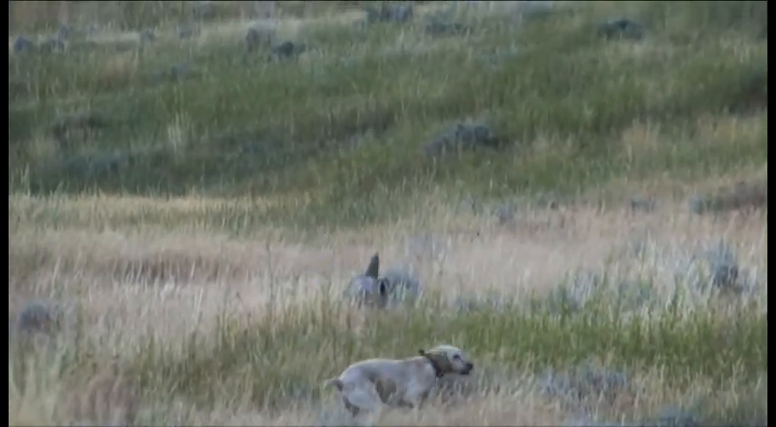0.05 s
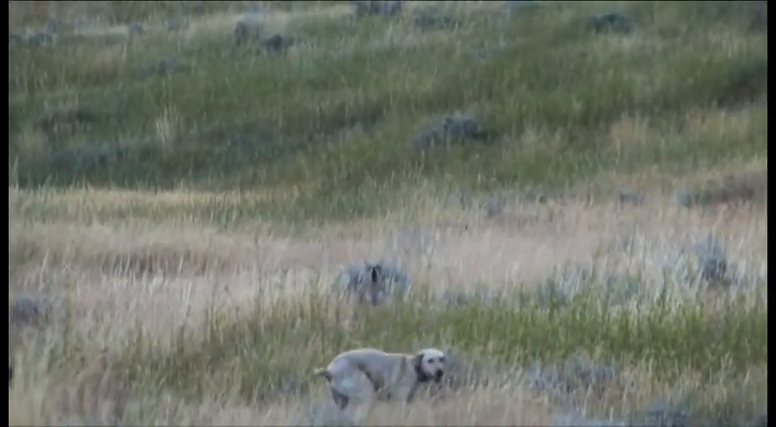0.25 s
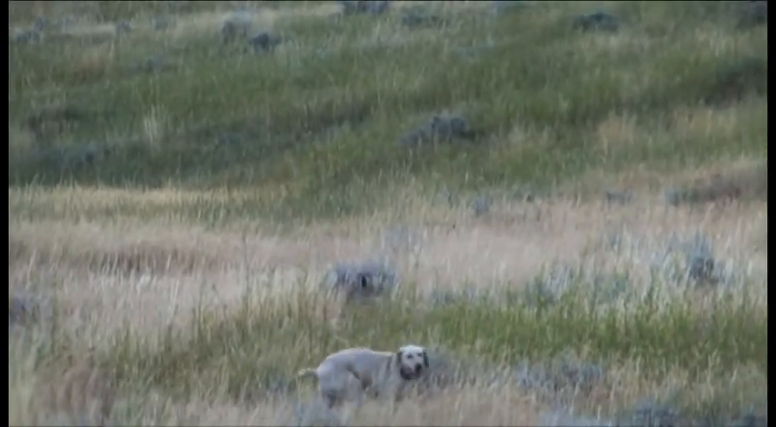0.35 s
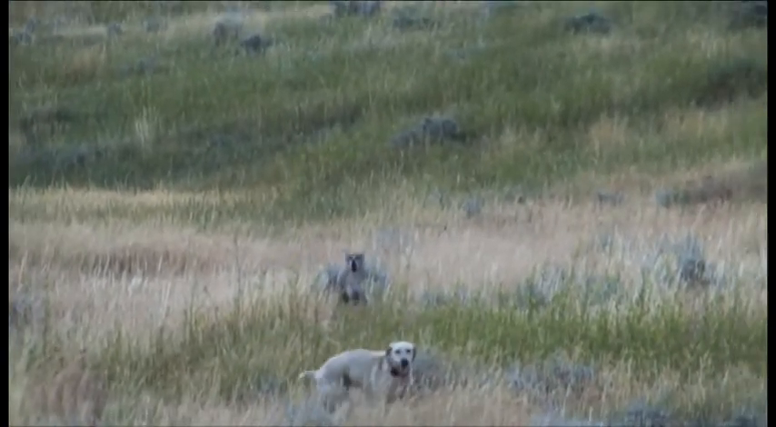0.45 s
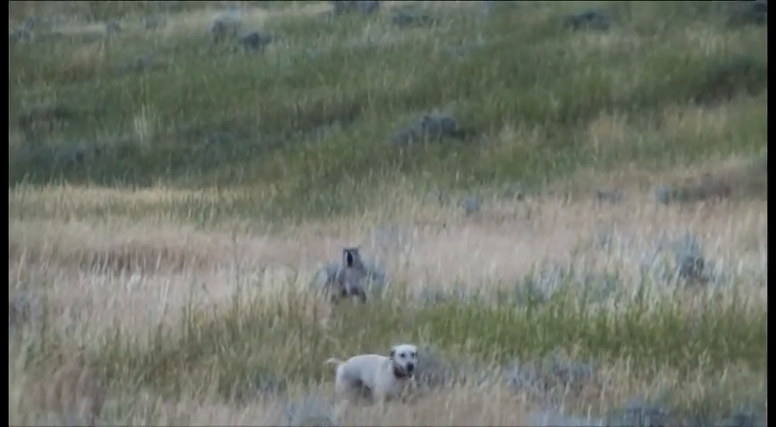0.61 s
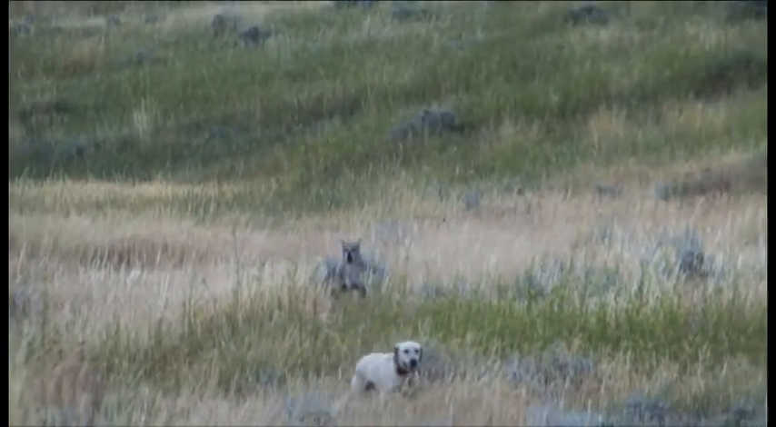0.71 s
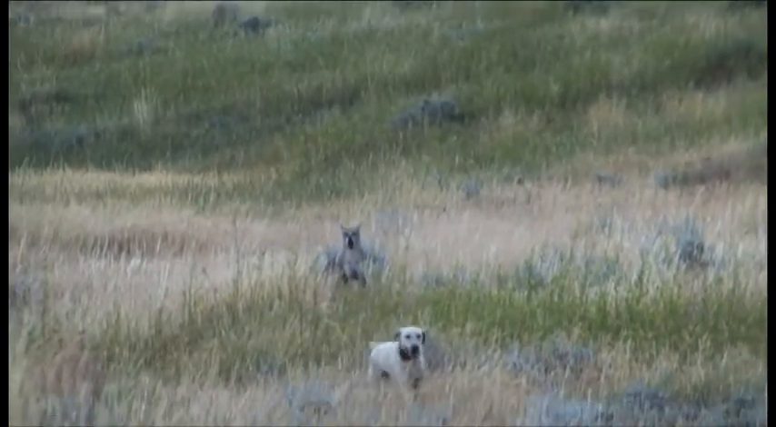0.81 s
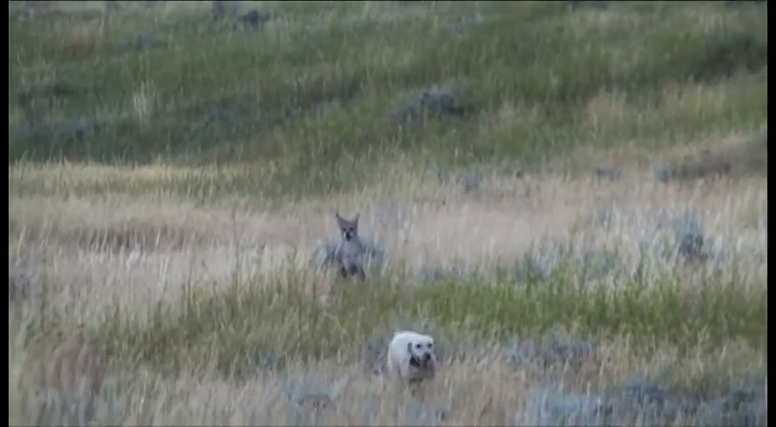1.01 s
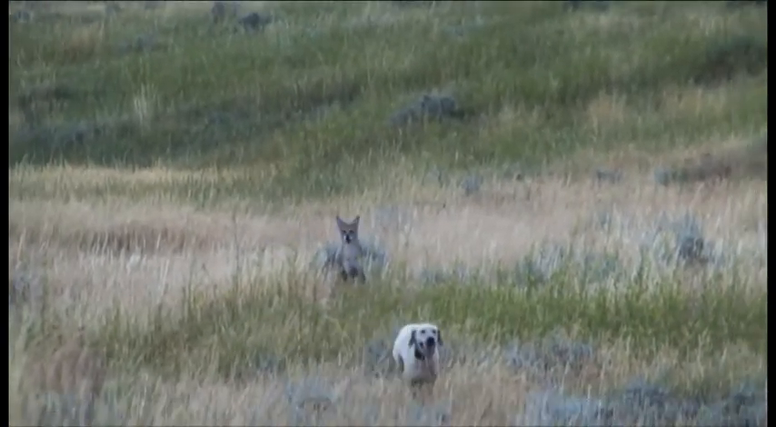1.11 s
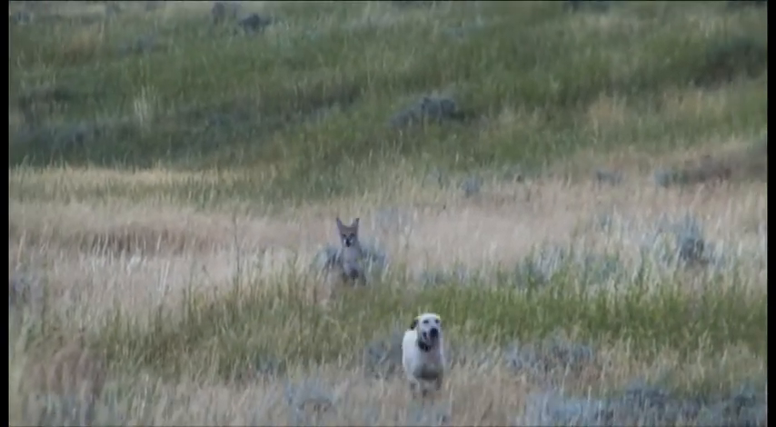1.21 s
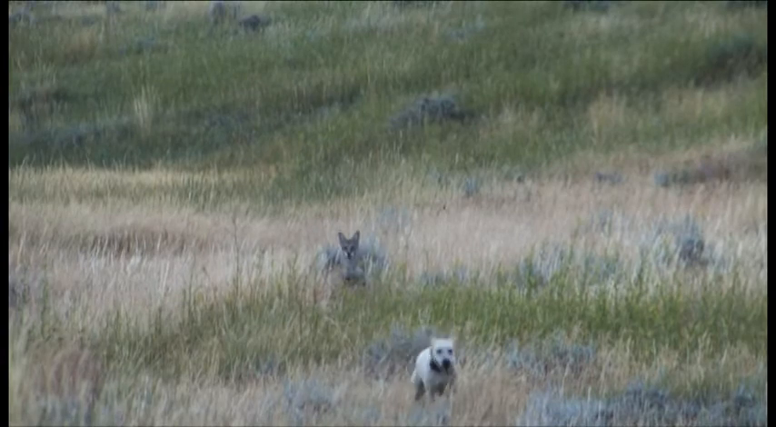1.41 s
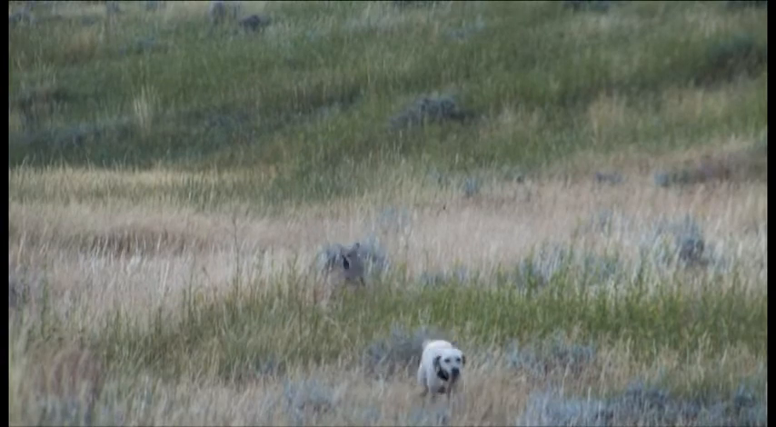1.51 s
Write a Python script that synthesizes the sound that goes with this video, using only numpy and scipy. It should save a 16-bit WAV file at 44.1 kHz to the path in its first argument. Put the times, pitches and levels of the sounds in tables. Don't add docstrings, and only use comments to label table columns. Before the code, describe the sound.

A coyote yips and barks across open grassland. The tail of a call fades by 0.1 s; a short high whine at 0.2 leads to a bark at 0.3. A long yip wavers up and down from 0.4 to 0.9, then a bark at 1.0 and a weaker one near 1.24. Distant, dulled, faintly echoing, over soft wind, hiss, low hum and a barely audible cricket.

```python
import sys
import numpy as np
from scipy import signal
from scipy.fft import rfft, irfft
from scipy.io import wavfile
from scipy.ndimage import uniform_filter1d, map_coordinates

SR = 44100
rng = np.random.default_rng(int(sys.argv[2]) if len(sys.argv) > 2 else 0)


def put_to_file(sound):
    columns = np.atleast_2d(sound).T
    safe = np.clip(columns, -1, 1)
    whole_steps = np.round(safe * 32767)
    wavfile.write(sys.argv[1], SR, whole_steps.astype(np.int16))


def volts_from_decibels(level):
    exponent = np.asarray(level, float) / 20
    return 10 ** exponent


N = 68355
T = np.arange(N) / SR
F_HZ = np.arange(1, N // 2 + 2) * SR / N


def rms_one(x):
    return x / np.sqrt(np.mean(np.abs(x) ** 2) + 1e-20)


def drift(hz):
    r = np.exp(-2 * np.pi * hz / SR)
    settle = 4000
    noise = rng.standard_normal(N + settle)
    return rms_one(signal.lfilter([1], [1, -2 * r, r * r], noise)[settle:])


def shaped_noise(response):
    return rms_one(irfft(rfft(rng.standard_normal(N)) * response, N))


def filtered(x, order, hz, kind="low"):
    return signal.sosfilt(signal.butter(order, hz, kind, fs=SR, output="sos"), x)


def tone(hz, phase=0):
    return np.sin(2 * np.pi * np.cumsum(hz) / SR + phase)


def swell(centre_s, length_s):
    return np.exp(-.5 * ((T - centre_s) / length_s) ** 2)


def air(points):
    hz, db = np.transpose(points)
    return shaped_noise(volts_from_decibels(np.interp(np.log(F_HZ), np.log(hz), db)))


def air_left():
    # f/Hz, level/dB per Hz
    spectrum = [(30, -13), (70, -3.5), (110, 5.5), (200, -10), (600, -27.5), (2000, -25.5), (6000, -30),
                (15000, -33.5)]
    return volts_from_decibels(-58.5) * air(spectrum)


def air_right():
    # f/Hz, level/dB per Hz
    spectrum = [(30, -9.5), (70, 5.5), (140, 4), (300, -2.5), (700, -9), (3500, -16), (6000, -21.5),
                (15000, -25)]
    return volts_from_decibels(-63.5 + drift(3.1)) * air(spectrum)


def hum():
    # f/Hz, level/dB rms
    lines = [(150, -56), (240, -78.5), (300, -71), (2130, -87.5)]
    out = np.zeros(N)
    for hz, db in lines:
        level = np.sqrt(2) * volts_from_decibels(db + 0.82 * drift(24.0))
        out += level * np.sin(2 * np.pi * hz * T + rng.uniform(0, 2 * np.pi))
    return out


def wind_thump():
    # t/s, level/dB, f/Hz, length/s
    thumps = [
        (0.4, -39, 96.5, 0.0084),
    ]
    return sum(volts_from_decibels(db) * swell(s, length_s) * np.sin(2 * np.pi * hz * (T - s))
               for s, db, hz, length_s in thumps)


def gust():
    rustle_hz = 290
    band = filtered(rng.standard_normal(N), 1, [rustle_hz / 2, rustle_hz * 2], "band")
    return volts_from_decibels(-57.5 + drift(8.9)) * swell(0.47, .09) * rms_one(band)


def cricket():
    tone_hz, throbs_per_s, start_cycles, level_db = 4830, 43, 0.9, -75
    throb = np.cos(2 * np.pi * (throbs_per_s * T - start_cycles) + .5 * drift(2.3)).clip(0, 1)
    return volts_from_decibels(level_db + 2.9 * drift(3)) * throb * np.sin(2 * np.pi * tone_hz * T + 2.0 * drift(60))


def slope_echo(x):
    level_db, t60_s, cut_hz, onset_s = -30.5, 0.4, 3300, 0.0042
    t = T[:SR // 4]
    tail = rng.standard_normal(len(t)) * volts_from_decibels(-60 * t / t60_s) * np.clip(t / onset_s, 0, 1)
    tail /= np.sqrt(np.sum(tail ** 2))
    return volts_from_decibels(level_db) * signal.fftconvolve(filtered(x, 2, cut_hz), tail)[:N]


def notched(x, notches):
    for hz, width_hz, db in notches:
        w, a = 2 * np.pi * hz / SR, np.pi * width_hz / SR
        zeros = [1 + a * volts_from_decibels(db), -2 * np.cos(w), 1 - a * volts_from_decibels(db)]
        poles = [1 + a, -2 * np.cos(w), 1 - a]
        x = signal.lfilter(zeros, poles, x)
    return x


def over_ground(x, notches, cut_hz, leak_db):
    x = notched(x, notches)
    return filtered(x, 4, cut_hz) + volts_from_decibels(leak_db) * x


def path_left(voice):
    # f/Hz, width/Hz, depth/dB
    notches = [(1888, 238, -21.5), (2564, 170, -13), (3503, 460, -21), (4724, 730, -17.5),
               (8910, 670, -9.5), (10600, 3600, -13)]
    return volts_from_decibels(3) * over_ground(voice + slope_echo(voice), notches, cut_hz=6530, leak_db=-10)


def path_right(voice):
    # f/Hz, width/Hz, depth/dB
    notches = [(1875, 600, -9.5), (2860, 230, -18.5), (4000, 940, -17), (850, 260, -10.5)]
    lead_s = 0.016
    turn = np.exp(2j * np.pi * np.arange(N // 2 + 1) * SR / N * lead_s)
    early = -irfft(rfft(voice) * turn, N) * (T < 1.4)
    return volts_from_decibels(-3.5) * over_ground(early + slope_echo(early), notches, cut_hz=3270, leak_db=-21)


def shade_db(rows, s, hz, width_hz, treble_hz):
    at_s, centre_hz, db, treble_db = np.transpose(rows)
    bell = np.exp(-(2 * (hz - np.interp(s, at_s, centre_hz)) / width_hz) ** 2)
    treble = np.interp(s, at_s, treble_db) / (1 + (treble_hz / hz) ** 16)
    return np.interp(s, at_s, db) * bell + treble


def wheeze():
    # t/s, level/dB, f/Hz, length/s
    puffs = [
        (0.096, -71.5, 1700, 0.026),
        (0.914, -48, 1480, 0.022),
        (1.104, -67.5, 1400, 0.015),
        (1.17, -57, 1500, 0.01),
        (1.32, -61.5, 1500, 0.013),
    ]
    width_hz = 250
    band = drift(width_hz) + 1j * drift(width_hz)
    return sum(volts_from_decibels(db) * swell(s, length_s) * np.real(band * np.exp(2j * np.pi * hz * T))
               for s, db, hz, length_s in puffs)


def whistle():
    start_hz, end_hz, fall_s, end_s = 3180, 2850, 0.016, 0.067
    hz = end_hz + (start_hz - end_hz) * np.exp(-T / fall_s)
    fade = np.clip(np.minimum(end_s - T, T - .004) / 0.0053, 0, 1)
    return volts_from_decibels(-62) * fade * tone(hz)


def moan():
    # t/s, f/Hz, level/dB
    points = [
        (.255, 638.4, -53.5),
        (.285, 531, -60),
        (.31, 511, -54.5),
        (.355, 508, -70.5),
    ]
    s, hz, db = np.transpose(points)
    fade = np.clip(np.minimum(T - s[0], s[-1] - T) / 0.0041, 0, 1)
    level = volts_from_decibels(np.interp(T, s, db) + 3 + 2.5 * drift(60))
    wobble_rad = 1.5 * drift(90) * np.clip((.305 - T) / .02, 0, 1)
    return fade * level * tone(np.interp(T, s, hz), wobble_rad)


def throat(hz):
    # f/Hz, width/Hz, level/dB
    resonances = [(819, 89, -10), (1629, 276, 1), (2175, 404, -4), (2882, 257, -10.5), (3700, 480, -21.5),
                  (5600, 2700, -60.5), (7400, 7000, -39)]
    out = 0
    for k, (f, width, db) in enumerate(resonances):
        out = out + (-1) ** k * volts_from_decibels(db) * 1j * hz * width / (f * f - hz * hz + 1j * hz * width)
    return out / np.sqrt(1 + (734 / hz) ** 8)


def roughness():
    # from/s, to/s, roughness left [0-1]
    clear = [
        (0, .08, .15),
        (.19, .25, .005),
        (.3, .37, .025),
        (.455, .6, .14),
        (.5, .535, .02),
        (.62, .84, .008),
        (.84, .872, .07),
        (.972, 1.055, .012),
        (1.232, 1.275, .08),
    ]
    hoarse, ramp_s = .75, .03
    curves = []
    for start_s, end_s, left in clear:
        outside_s = np.maximum(start_s - T, T - end_s).clip(0)
        curves.append(np.clip(left + hoarse * outside_s / ramp_s, 0, hoarse))
    return np.min(curves, axis=0)


def call(rows, rough, jitter, shimmer, breath, patches, tilt_db, low_db):
    # t/s, f/Hz, level/dB, treble/dB
    shade_left = [(.02, 2250, -17, 0), (.24, 2860, -13, -3), (.29, 3130, -22, -1), (.345, 3430, -22, 2),
                  (.375, 3650, 2.5, -5), (.47, 2950, 5, 0), (.63, 2500, -3.5, 1), (.66, 3350, 4.5, 2),
                  (.685, 3300, -2.5, 0.5), (.705, 3130, -10, -3), (.735, 3050, 11.5, -2),
                  (.76, 2950, -9, -4), (.78, 3360, -26, -2.5), (.81, 3040, -13, -1), (.85, 3360, 7.5, -1),
                  (.975, 2462, -2.5, 6.5), (1.0, 2530, 3, 7.5), (1.015, 2210, -10.5, 5.5),
                  (1.045, 2220, -2.5, -1), (1.25, 2430, 5, 0)]
    shade_right = [(.24, 2650, -11.5, 0), (.29, 2950, -21, -14), (.345, 2960, -16, -9), (.375, 3000, 2, 4),
                   (.47, 3700, -2, 3.5), (.52, 2200, -3, -1), (.63, 3000, 9.5, -6), (.66, 2800, -14, -1),
                   (.705, 3150, -4.5, -7), (.735, 3050, 16, 0.5), (.78, 3250, -14, -5),
                   (.81, 2450, 9, -0.5), (.975, 2060, -6.5, 3), (1.0, 2590, -3, -5), (1.03, 2650, -11, -7),
                   (1.25, 2530, 6, 3)]
    paths = (shade_left, 600, 4200), (shade_right, 530, 0.81 * 4200)  # width/Hz, treble corner/Hz
    jitter_rad, shimmer_depth, subharmonic = .22, .35, 1.1
    breath_share, breath_pulsing, breath_floor_db, full_hoarse = .7, .9, -37, .75
    dip_hz, dip_width_hz, dip_db = 1879, 316, -22
    patchy_db, patch_width_hz = 5, 450

    s, *columns = np.transpose(rows)
    on = (T >= s[0]) & (T < s[-1])
    t, r = T[on], rough[on]
    pitch_hz, db, mouth, dip = (uniform_filter1d(np.interp(t, s, c), size=250, mode="nearest")
                                for c in columns)
    phase = 2 * np.pi * np.cumsum(pitch_hz) / SR + jitter_rad * np.sqrt(r) * jitter[on]
    k = np.arange(1, 25)[:, None]
    hz = k * pitch_hz

    nasal_dip_db = dip_db * np.exp(-(2 * (hz - dip_hz * dip) / dip_width_hz) ** 2)
    where = [hz / patch_width_hz, np.flatnonzero(on) + 0 * hz]
    patch = map_coordinates(patches, where, order=1, mode="nearest")
    patch_db = patchy_db * np.clip(hz / 4000 - .3, 0, 1) * patch
    gains = throat(hz / mouth) * volts_from_decibels(tilt_db * np.log2(hz / 1500) + nasal_dip_db + patch_db)
    gains *= hz < 11000
    gains[0] += volts_from_decibels(low_db)
    power = .5 * np.sum(np.abs(gains) ** 2, axis=0)
    pulses = np.real(gains * np.exp(1j * k * phase)) / np.sqrt(power)
    voice = np.array([np.sum(pulses * volts_from_decibels(shade_db(shade, t, hz, *shape)), axis=0)
                      for shade, *shape in paths])

    folds = np.sqrt(1 - breath_share * r) * (1 + shimmer_depth * r * shimmer[on])
    folds *= 1 + subharmonic * r * np.cos(phase / 2 + shimmer[on])
    breath_level = volts_from_decibels(breath_floor_db) + np.sqrt(breath_share * r * r / full_hoarse)
    puffs = breath_level * (1 + breath_pulsing * np.cos(phase)) * breath[on]
    already_on = s[0] == 0
    fade = np.clip(np.minimum(t - s[0] + already_on, s[-1] - t) / .003, 0, 1)
    out = np.zeros((2, N))
    out[:, on] = volts_from_decibels(db) * fade * (voice * folds + puffs)
    return out


def coyote():
    # t/s, pitch f/Hz, level/dB, mouth opening
    tail = [
        (0, 759, -44, 0.84, 1.17),
        (.027, 703, -53.5, 0.82, 0.47),
        (.04, 520, -51, 0.79, 1.13),
        (.075, 590, -61.5, 0.8, 1.2),
        (.1, 570, -82, 0.92, 2.3),
    ]
    whine = [
        (.194, 912, -39.5, 1.13, 1.9),
        (.212, 898, -34.5, 1.14, 1.9),
        (.262, 812, -43.5, 1.006, 1.75),
    ]
    bark = [
        (.25, 388.3, -46, 0.874, 0.88),
        (.275, 420.5, -40, 0.93, 0.92),
        (.295, 484.4, -28, 0.95, 1.0),
        (.313, 460.3, -26.5, 0.99, 1.075),
        (.353, 473.5, -29.5, 1.035, 0.87),
        (.372, 425.7, -34, 1.06, 1.035),
        (.39, 366, -35.5, 0.96, 0.83),
        (.405, 357, -54.5, 1.07, 0.52),
    ]
    long_yip = [
        (.405, 365.4, -46, 1.16, 0.77),
        (.425, 388, -44.5, 1.6, 0.84),
        (.449, 411.2, -27, 1.117, 1.07),
        (.481, 461.7, -27.5, 1.07, 1.025),
        (.507, 546.5, -25.5, 1.075, 1.083),
        (.533, 548.6, -27, 1.127, 1.086),
        (.55, 435.2, -30.5, 1, 1.07),
        (.575, 374.8, -34.5, 1.07, 1.02),
                (.607, 435, -32.5, 0.93, 1.01),
        (0.615, 485, -25.5, 0.97, 1.04),
        (0.635, 511.3, -25, 0.92, 1.03),
        (.652, 560.6, -24.5, 0.91, 1.144),
        (0.689, 547.8, -24.5, 1.08, 1.086),
        (.705, 511, -27, 1.04, 1.2),
        (0.721, 489, -37.5, 1.06, 1.14),
                (0.746, 516.4, -32.5, 1.15, 1.66),
        (0.765, 547, -28, 1.05, 0.97),
        (0.799, 608.4, -30, 0.99, 1.053),
        (0.832, 617, -31, 0.93, 1.108),
                (.852, 507, -29, 0.94, 0.85),
        (0.868, 413, -32.5, 0.95, 1.15),
        (0.88, 379.3, -34, .94, 1.8),
        (0.915, 336, -68.5, 0.76, 1.8),
    ]
    second_bark = [
        (.915, 367, -56.5, 0.82, 0.95),
        (.962, 389.4, -30, 0.93, 1.18),
        (1.0, 433.2, -29, 0.91, 0.89),
        (1.022, 444.4, -26.5, 1, .93),
        (1.045, 439.2, -31.5, 0.97, 0.93),
        (1.063, 371, -33, 1, 1.17),
        (1.087, 335.4, -55.5, 0.85, 0.85),
        (1.11, 323, -68, 0.34, 0.89),
    ]
    last_bark = [
        (1.14, 325.4, -75, 0.62, 0.87),
        (1.178, 351.4, -45, 0.79, 0.94),
        (1.206, 357.5, -37.5, 0.93, 1.04),
        (1.242, 419.7, -33, 0.94, 1.007),
        (1.26, 429, -35, 0.92, 1.026),
        (1.282, 341.2, -37, 0.95, 1.17),
        (1.305, 317.3, -58, 0.8, 0.64),
        (1.34, 290, -77, .9, 0.96),
    ]
    breath_peak = volts_from_decibels(7 * np.exp(-((F_HZ - 1370) / 130) ** 2))
    breath = shaped_noise(throat(F_HZ) * breath_peak)
    patches = np.array([drift(18) for _ in range(24)])
    shared = roughness(), drift(120), drift(120), breath, patches
    yip = long_yip
    voice = call(tail, *shared, tilt_db=-2.5, low_db=-6.0)
    voice += call(whine, *shared, tilt_db=-7.0, low_db=-25.0)
    voice += call(bark, *shared, tilt_db=-0.3, low_db=-43)
    voice += call(yip, *shared, tilt_db=0.86, low_db=-43)
    voice += call(second_bark, *shared, tilt_db=-2.3, low_db=-43)
    voice += call(last_bark, *shared, tilt_db=-1.0, low_db=-43)
    return filtered(voice, 2, 765, "high") + whistle() + moan() + wheeze()


def scene():
    voice, aside = coyote()
    left = path_left(voice) + air_left() + hum() + wind_thump() + cricket()
    right = path_right(aside) + air_right() + gust() + 0.35 * cricket()
    return np.array([left, right])


def band_limit(x):
    return signal.sosfilt(signal.butter(12, 15800, fs=SR, output="sos"), x)


def record(dry):
    low_pass = signal.cheby2(12, 70, 15750 + 850, fs=SR, output="sos")
    mix = signal.sosfilt(low_pass, dry)
    return band_limit(mix)


dry = scene()
out = record(dry)
put_to_file(out)
```